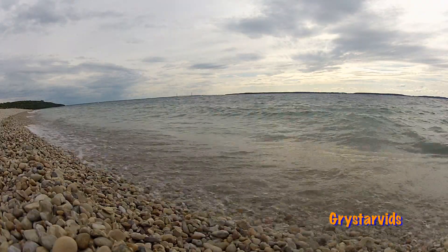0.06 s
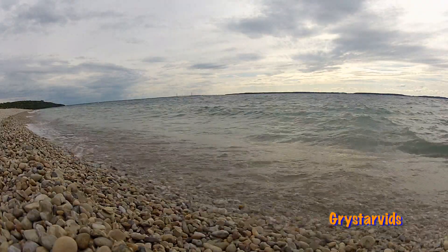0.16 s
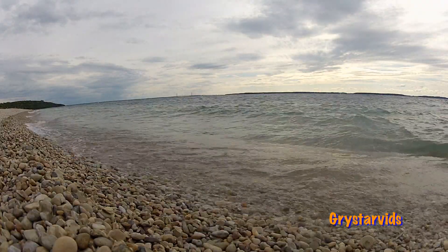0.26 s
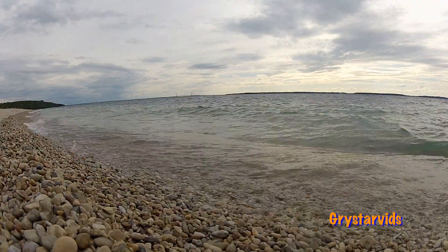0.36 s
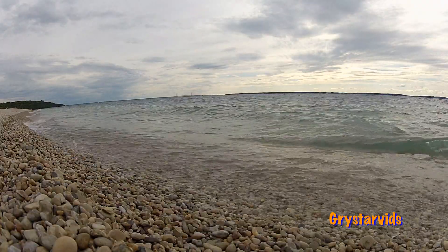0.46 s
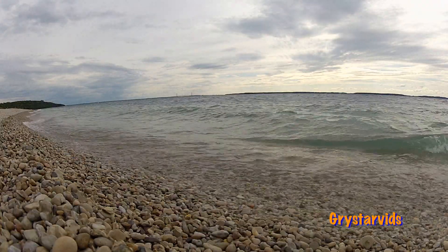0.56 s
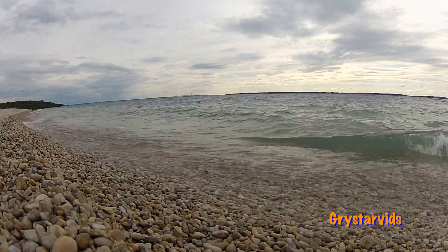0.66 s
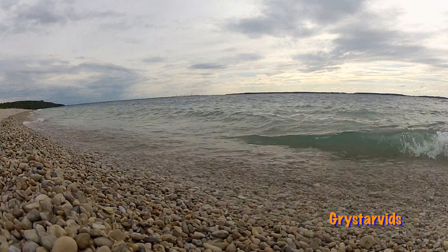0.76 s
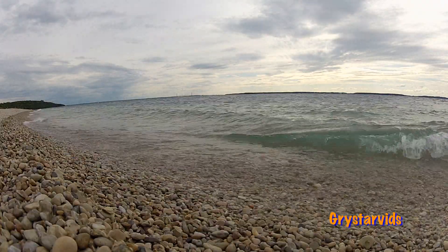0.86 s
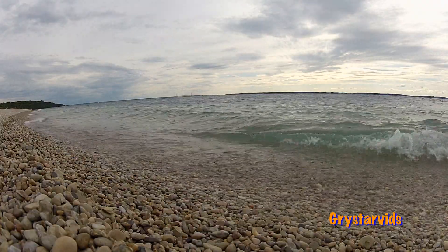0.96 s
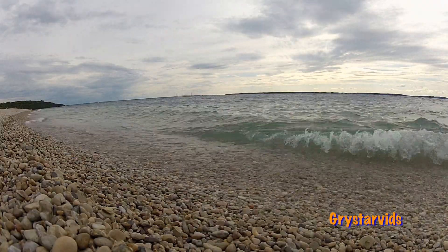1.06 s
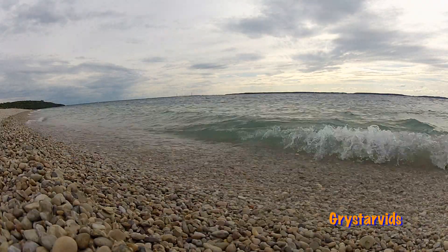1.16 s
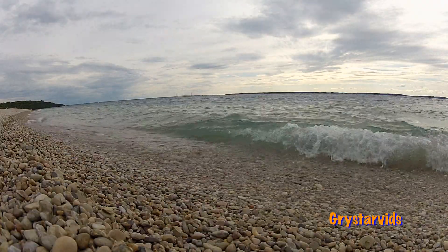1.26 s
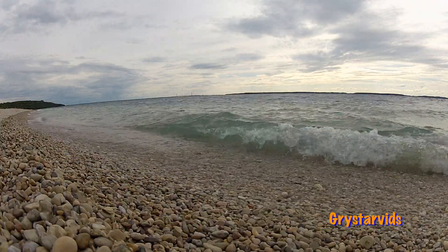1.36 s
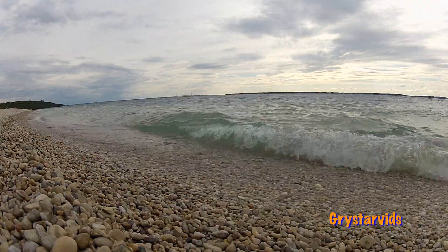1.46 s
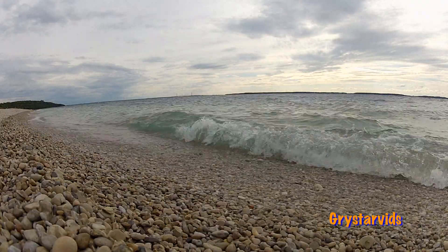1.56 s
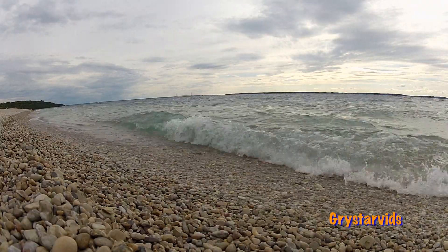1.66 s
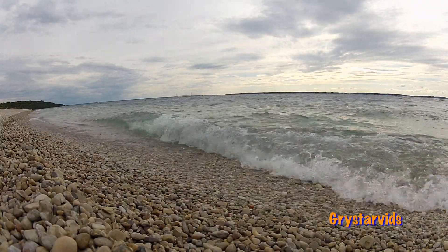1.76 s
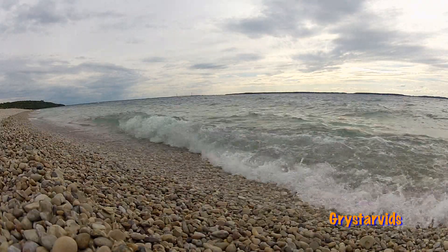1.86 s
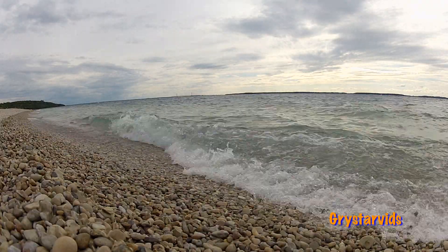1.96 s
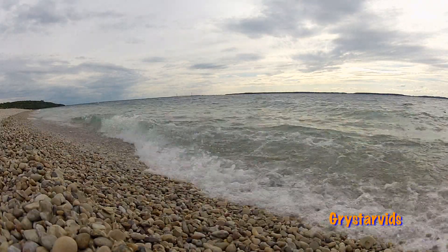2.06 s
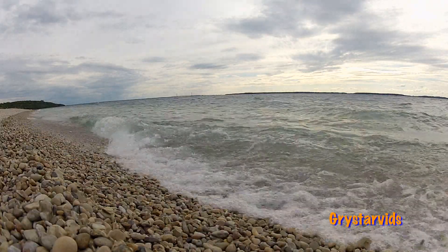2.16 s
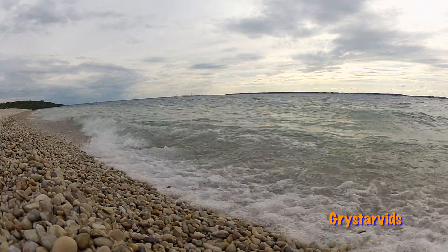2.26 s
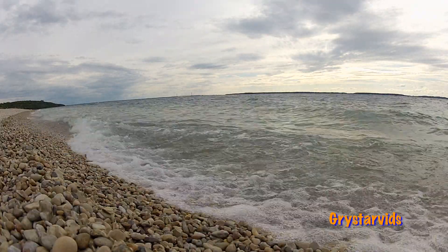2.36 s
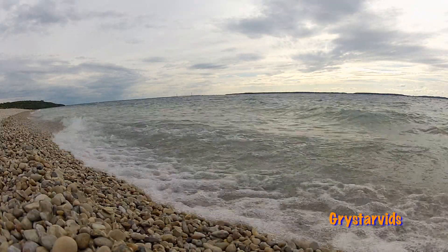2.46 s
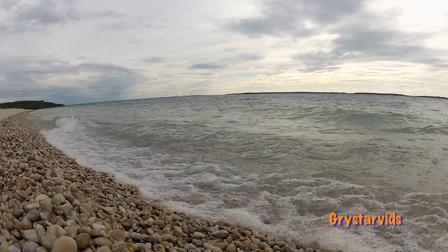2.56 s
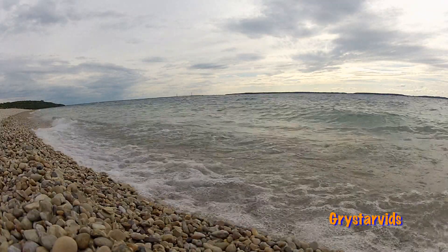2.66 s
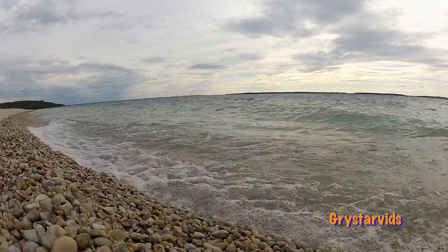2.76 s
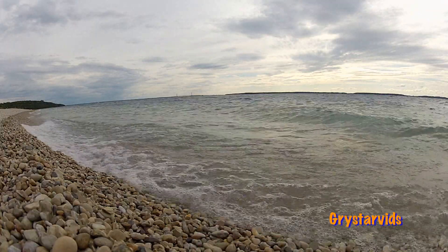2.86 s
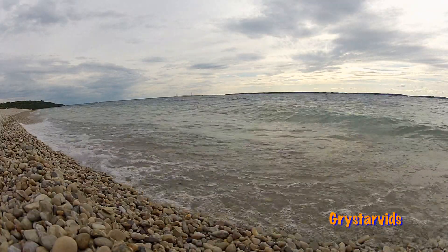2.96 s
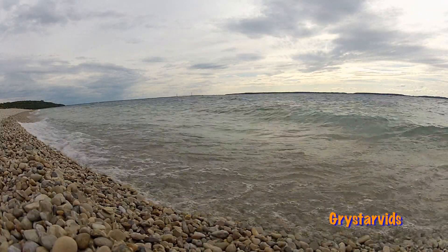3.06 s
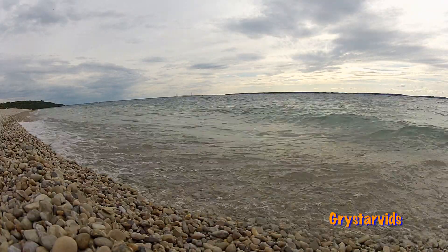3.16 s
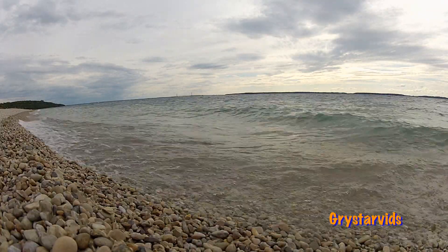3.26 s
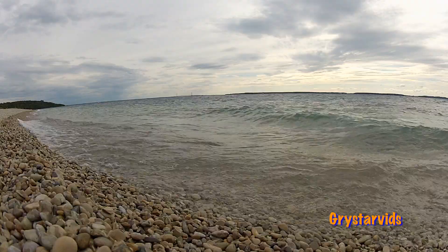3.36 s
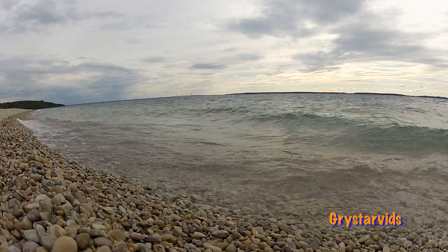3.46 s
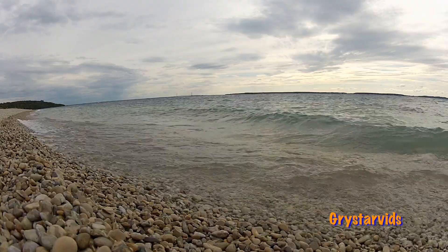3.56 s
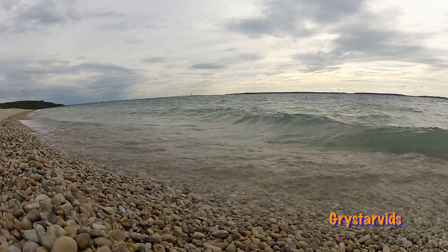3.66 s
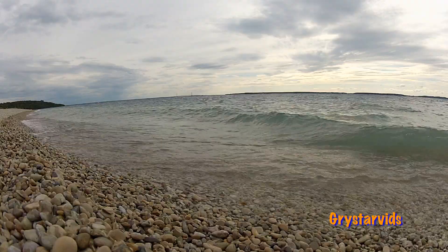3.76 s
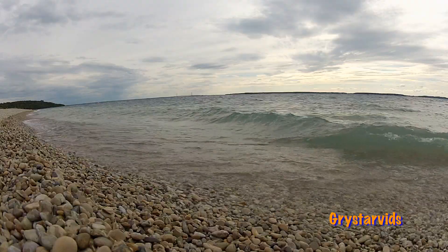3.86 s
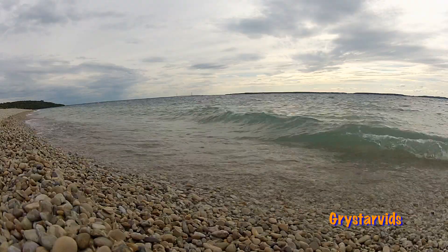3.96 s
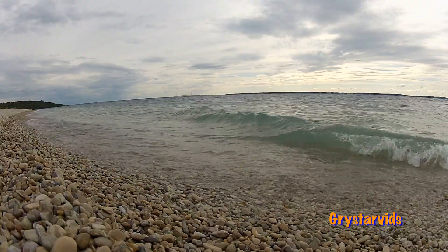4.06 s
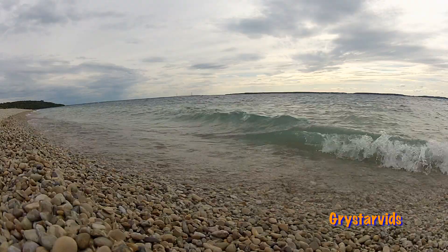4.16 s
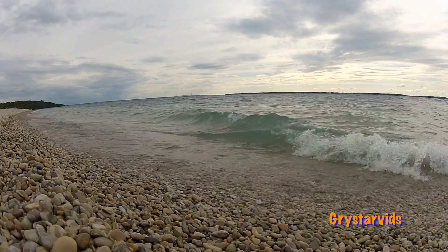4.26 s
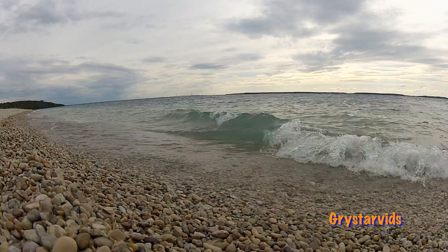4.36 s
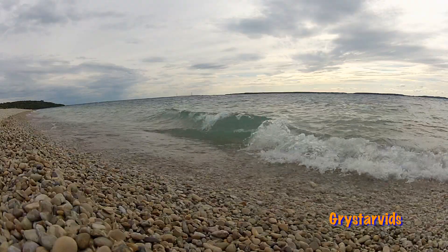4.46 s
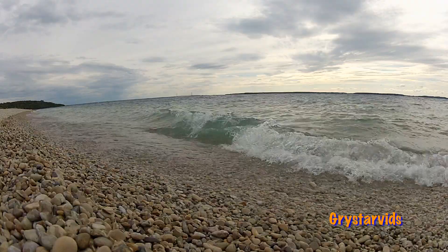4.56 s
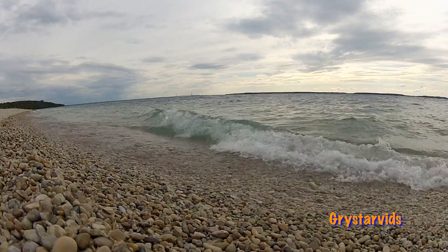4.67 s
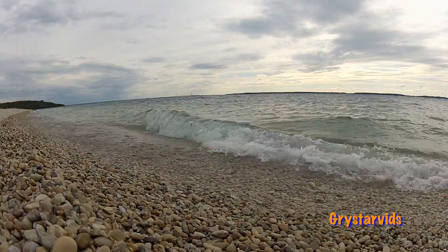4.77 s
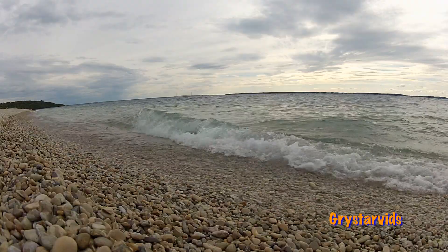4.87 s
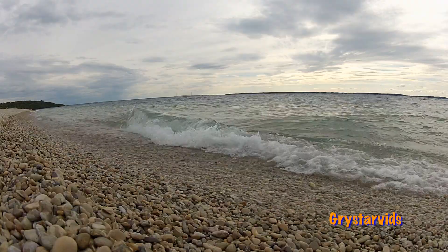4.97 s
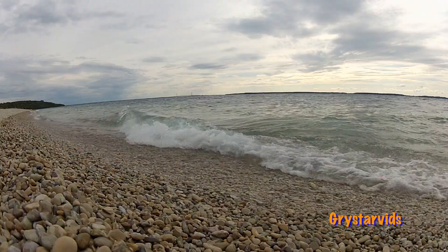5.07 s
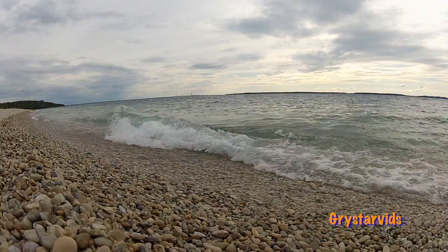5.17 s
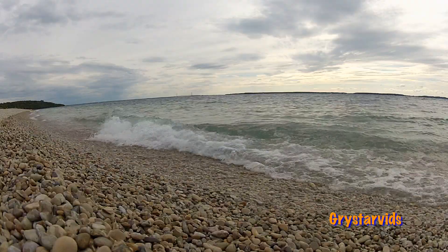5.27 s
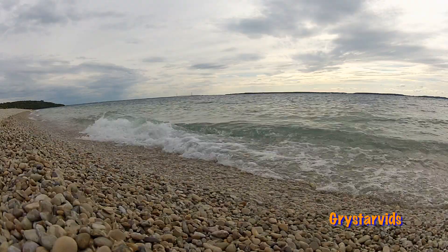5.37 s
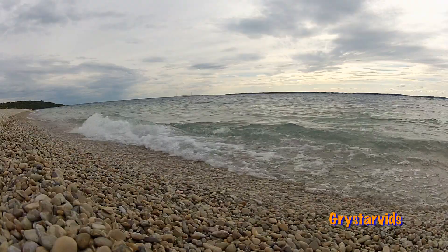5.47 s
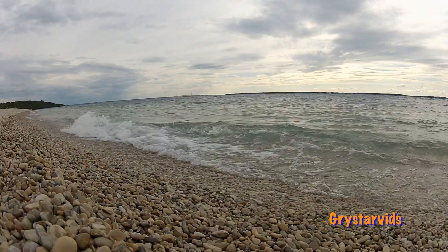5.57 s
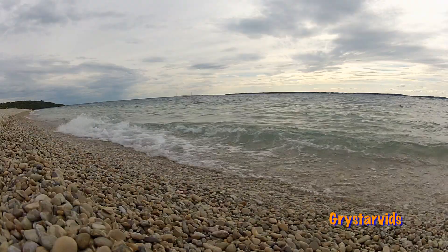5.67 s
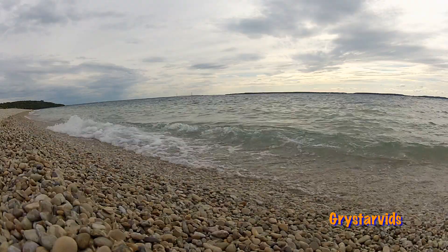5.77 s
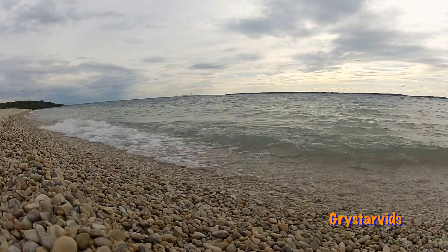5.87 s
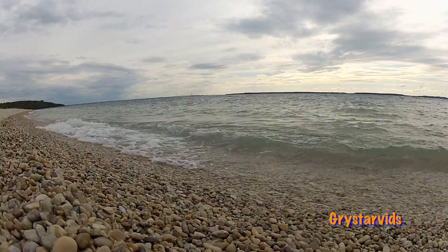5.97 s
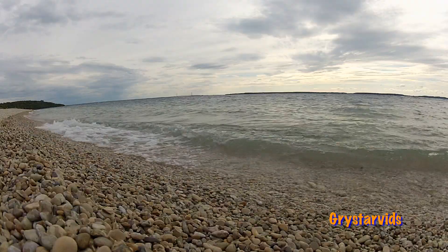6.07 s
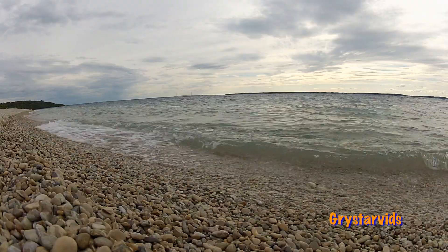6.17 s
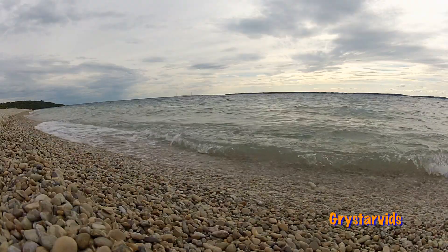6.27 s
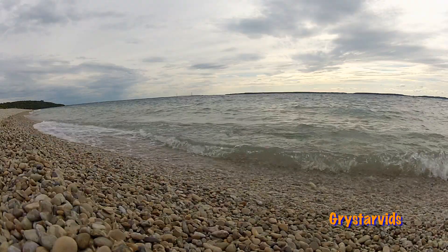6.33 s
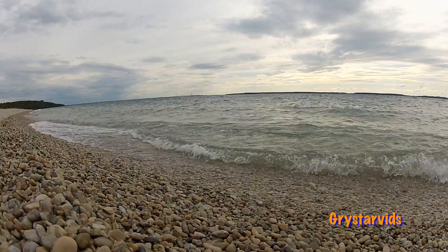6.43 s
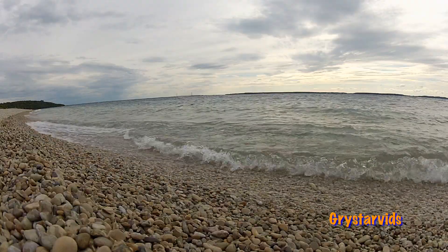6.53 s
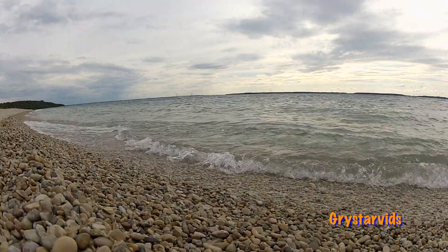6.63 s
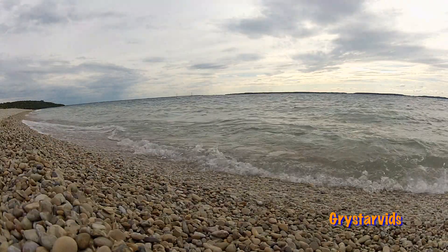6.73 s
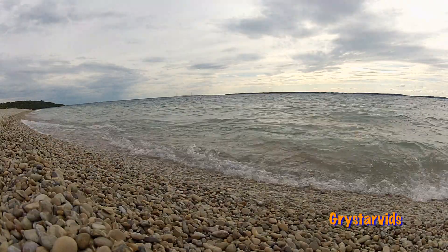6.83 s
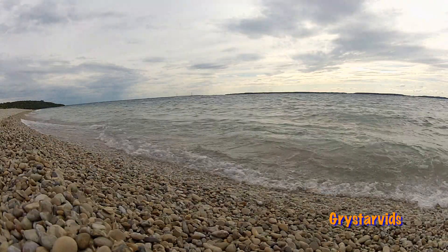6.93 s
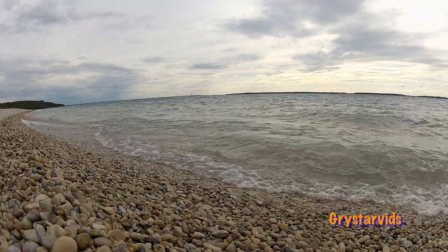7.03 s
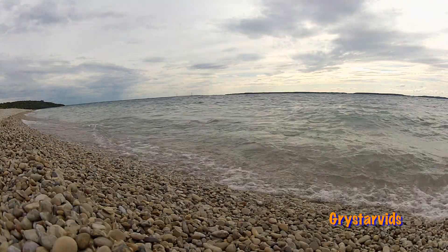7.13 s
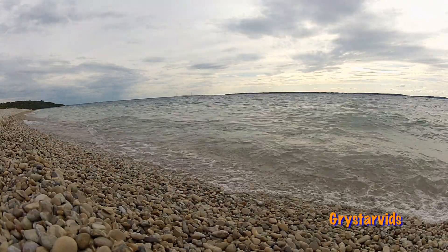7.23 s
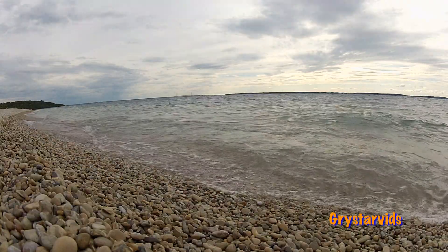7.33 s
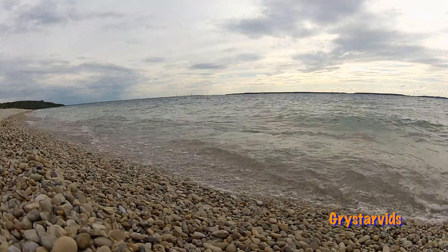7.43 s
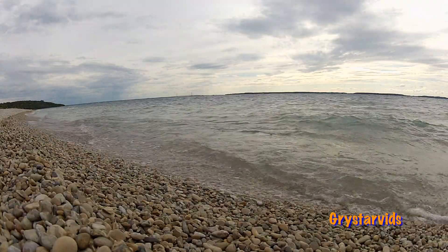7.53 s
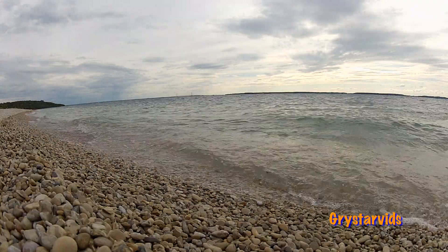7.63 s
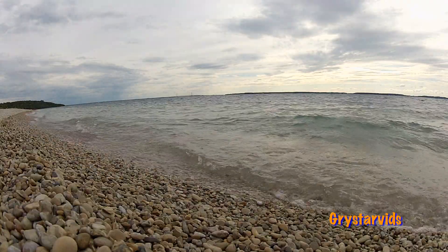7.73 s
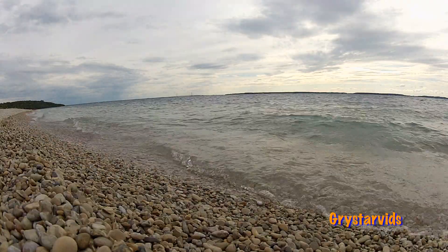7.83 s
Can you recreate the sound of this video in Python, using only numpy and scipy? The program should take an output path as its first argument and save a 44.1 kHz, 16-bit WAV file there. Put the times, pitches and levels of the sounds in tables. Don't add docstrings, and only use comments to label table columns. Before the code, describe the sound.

Small waves on a pebble beach, heard close through a tiny microphone sealed in a plastic case. Surf swells and crashes at about two seconds, again past four, and more weakly after six, each fading into a bubbling wash. A few stones knock, drops tick, and low wind booms throughout, with hollow thumps thickening near the end over faint hiss.

```python
import sys
import numpy as np
from scipy import signal
from scipy.fft import rfft, irfft, next_fast_len
from scipy.io import wavfile
from scipy.ndimage import uniform_filter1d, map_coordinates

SR = 44100
rng = np.random.default_rng(int(sys.argv[2]) if len(sys.argv) > 2 else 0)


def waveform_to_disk(signal):
    frames = np.transpose(np.atleast_2d(signal))
    scaled = np.clip(frames, -1, 1) * 32767
    samples = np.round(scaled).astype(np.int16)
    wavfile.write(sys.argv[1], SR, samples)


def how_loud(loudness_db):
    steps = np.asarray(loudness_db, float) / 20
    return 10 ** steps


N = 348390


def rms_one(x):
    return x / np.sqrt(np.mean(x ** 2) + 1e-20)


def noise_band(low_hz, high_hz):
    return band(rng.standard_normal(N), low_hz, high_hz)


def band(x, low_hz, high_hz):
    return signal.sosfilt(signal.butter(3, [low_hz, high_hz], "band", fs=SR, output="sos"), x)


def drift(rate_hz):
    step, settle = 20, 2000
    pole = np.exp(-2 * np.pi * rate_hz * step / SR)
    coarse = rng.standard_normal(N // step + settle + 2)
    slow = signal.lfilter([1], [1, -2 * pole, pole * pole], coarse)[settle:]
    return np.interp(np.arange(N) / step, np.arange(len(slow)), rms_one(slow))


def swells(rows, *laws):
    t = np.arange(0, N + 64, 64) / SR
    start, hold, *levels = np.transpose(rows)[:, :, None]
    early = np.maximum(start - t, 0)
    late = np.maximum(t - start - hold, 0)
    curves = []
    for level_db, (swell, fade, lull_db) in zip(levels, laws):
        strongest = (level_db - swell * early - fade * late).max(axis=0)
        curves.append(np.interp(np.arange(N) / SR, t, np.maximum(strongest, lull_db)))
    return curves


def ring(clicks, hz, t60):
    r, w = how_loud(-60 / (t60 * SR)), 2 * np.pi * hz / SR
    return signal.lfilter([0, np.sin(w)], [1, -2 * r * np.cos(w), r * r], clicks + 1e-18)


def resonate(x, modes):
    size = next_fast_len(N + SR // 2, True)
    f = np.linspace(1, SR / 2, size // 2 + 1)
    power = 0
    for hz, width, level_db in modes:
        detune = (f - hz * hz / f) / width
        power = power + how_loud(2 * level_db) / (1 + detune ** 2) ** 2
    cepstrum = irfft(np.log(power + 1e-12) / 2, size)
    cepstrum[1:size // 2] *= 2
    cepstrum[size // 2 + 1:] = 0
    return irfft(rfft(x, size) * np.exp(rfft(cepstrum)), size)[:N]


def steady(x, over_s, share):
    power = np.abs(uniform_filter1d(x * x, round(over_s * SR)))
    swelling = np.sqrt(power + 0.054 * np.mean(x * x))
    return rms_one(x / swelling ** share)


# f/Hz, width/Hz, level/dB
CASE_MODES = [(543, 640, -22), (1186, 370, -1), (1591, 210, 2), (1800, 510, 0.5), (2040, 310, 3.5),
              (2423, 130, -6), (2735, 230, -4.5), (3240, 340, -14.5), (3900, 460, -25.5),
              (4110, 370, -25.5), (4775, 310, -16.5), (5110, 830, -17)]


def in_case(x):
    return resonate(x, CASE_MODES)


def bubbles(low_hz, high_hz, per_s, spread_db, cycles, far_db, surge_db):
    sizes = how_loud(spread_db * np.minimum(rng.exponential(1, N), 3.2)) * rng.choice([-1, 1], N)
    born = sizes * (rng.random(N) < per_s / SR)
    pitches = np.geomspace(low_hz, high_hz, 8)
    dealt = rng.integers(0, len(pitches), N)
    near = rms_one(sum(ring(born * (dealt == k), hz, cycles / hz) for k, hz in enumerate(pitches)))
    far = how_loud(far_db) * rms_one(noise_band(low_hz, high_hz))
    return rms_one(how_loud(surge_db) * in_case(band(near + far, low_hz, high_hz)))


# arrival t/s, hold t/s, breaking crest level/dB, trapped air level/dB, wash over pebbles level/dB
SURGES = [(0, .05, -67, -63.5, -57.5), (.3, .15, -69, -60.5, -59.5), (.54, 0.16, -59.5, -53, -52.5),
          (.72, .1, -54.5, -50, -51), (.95, 0.76, -56.5, -52, -51.5), (1.45, 0.12, -54.5, -49.5, -48),
          (1.6, 0.33, -53, -49.5, -47.5), (1.93, 0.15, -52.5, -47, -47), (2.42, 0.17, -65.5, -56, -53.5),
          (2.95, 0.39, -76, -64, -62), (3.35, 0.38, -70.5, -62.5, -60), (3.8, .06, -65, -60, -59.5),
          (3.94, 0.16, -62.5, -53, -55.5), (4.1, 0.24, -55.5, -52.5, -52.5), (4.42, 0.09, -53, -59.5, -51),
          (4.75, 0.29, -60.5, -62.5, -52), (5.5, .25, -68.5, -75, -61), (6.05, .04, -65.5, -62, -60.5),
          (6.16, .05, -62, -56, -56), (6.29, 0.43, -58, -53.5, -53.5), (6.72, 0.017, -59.5, -55.5, -53.5),
          (6.9, 0.35, -64.5, -57, -60.5), (7.56, .1, -65.5, -58, -54.5), (7.74, 0.017, -63.5, -53, -59.5)]
# swell rate/(dB/s), fade rate/(dB/s), lull level/dB
CREST_LAW = (54, 22.5, -72)
AIR_LAW = (61, 28, -68)
WASH_LAW = (60, 18.6, -62.5)


def surf(spill):
    crest_db, air_db, wash_db = swells(SURGES, CREST_LAW, AIR_LAW, WASH_LAW)
    crest = bubbles(747, 1486, 1500, 3.5, 8.5, 0.1, 0.9 * spill + 1.0 * drift(38))
    air = bubbles(1340, 1974, 1200, 4.3, 16.4, 0.08, 0.9 * spill + 0.2 * drift(43))
    wash = bubbles(1790, 3270, 2500, 3.7, 7.3, 0.15, 0.8 * spill + 1.04 * drift(31))
    roar_db = -68.5 + 0.6 * (crest_db + 56.5)
    roar = how_loud(roar_db) * rms_one(noise_band(307, 896))
    return how_loud(crest_db) * crest + how_loud(air_db) * air + how_loud(wash_db) * wash + roar


# arrival t/s, hold t/s, foam level/dB, fine bubbles level/dB
SPLASHES = [(0, 0.018, -66, -64.5), (.1, 0.24, -67.5, -68), (.56, 0.046, -63.5, -69),
            (.74, 0.031, -62, -64), (.9, 0.81, -61, -63.5), (1.4, 0.13, -58, -58.5), (1.58, 0.13, -56, -57),
            (1.83, 0.18, -57.5, -57.5), (2.12, 0.088, -63, -64), (2.38, .03, -67.5, -68),
            (2.7, .02, -71, -70), (2.81, .02, -71, -67.5), (2.98, 0.022, -70.5, -74),
            (3.9, .05, -68.5, -69), (4.01, 0.12, -63.5, -64.5), (4.2, .13, -59, -60.5),
            (4.4, 0.067, -58, -62.5), (4.57, 0.11, -60.5, -65), (4.8, 0.038, -60, -74),
            (4.93, 0.19, -63.5, -74), (5.28, 0.053, -65, -73.5), (5.45, 0.2, -70.5, -82),
            (6.07, .12, -68.5, -69), (6.25, 0.16, -64, -67), (6.46, 0.11, -61.5, -63),
            (6.68, 0.078, -62, -67), (7.0, 0.018, -68.5, -71), (7.19, 0.026, -69.5, -74),
            (7.57, .08, -70.5, -65.5), (7.8, .05, -70.5, -69)]
# swell rate/(dB/s), fade rate/(dB/s), lull level/dB
FOAM_LAW = (55, 41, -74.5)
FINE_LAW = (70, 34, -78.5)


def spray(spill):
    foam_db, fine_db = swells(SPLASHES, FOAM_LAW, FINE_LAW)
    fine = bubbles(2890, 3670, 2000, 1.1, 2.7, 0.1, 0.6 * spill + 0.83 * drift(35))
    foam = bubbles(3294, 6940, 2500, 4.5, 2.9, 0.1, 0.6 * spill + 0.47 * drift(38))
    return how_loud(fine_db) * fine + how_loud(foam_db) * foam


# arrival t/s, hold t/s, boom level/dB, buffeting level/dB
GUSTS = [(0, 0.43, -53, -65), (.63, 0.085, -57, -61), (.91, 0.1, -55, -64.5), (1.14, 0.03, -62, -66),
         (1.31, 0.031, -65, -66.5), (1.51, 0.027, -67, -75), (1.64, 0.024, -65, -64), (1.78, 0.2, -65, -66),
         (1.98, 0.48, -51.5, -68), (2.38, 0.043, -46, -62.5), (2.51, 0.34, -52.5, -65),
         (2.85, 0.27, -57, -68), (3.22, 0.045, -56.5, -72), (3.3, 0.39, -64, -70.5),
         (3.92, 0.15, -62.5, -72), (4.16, 0.048, -57, -74), (4.39, 0.098, -49.5, -62),
         (4.76, 0.042, -66, -66), (4.89, 0.016, -54, -63), (5.04, 0.024, -52.5, -62.5),
         (5.3, 0.32, -54, -65), (5.72, 0.24, -54.5, -65.5), (6.0, 0.35, -55.5, -66.5),
         (6.4, 0.028, -49, -72), (6.58, 0.12, -59, -63.5), (6.71, 0.19, -48.5, -60.5),
         (7.0, 0.13, -51, -59), (7.18, 0.1, -57, -54), (7.37, 0.059, -56, -68), (7.54, 0.46, -50, -59)]
# swell rate/(dB/s), fade rate/(dB/s), lull level/dB
BOOM_LAW = (230, 240, -63.5)
BUFFET_LAW = (75, 200, -69.5)
# f/Hz, width/Hz, level/dB
AIR_SPRING = [(141.5, 110, -7), (166.9, 35, 8.5), (220, 107, -8.5)]


def gusts():
    boom_db, buffet_db = swells(GUSTS, BOOM_LAW, BUFFET_LAW)
    boom = steady(resonate(noise_band(85, 340), AIR_SPRING), 0.05, 0.55)
    dulled = signal.butter(2, 280, fs=SR, output="sos")
    buffet = steady(signal.sosfilt(dulled, noise_band(190, 890)), 0.03, 0.6)
    return how_loud(boom_db) * boom + how_loud(buffet_db) * buffet


# arrival t/s, hold t/s, thud level/dB, push level/dB
LEANS = [(.08, 0.13, -63.5, -68), (.35, 0.19, -65, -61), (.62, .05, -66, -69), (.86, 0.069, -64, -64),
         (1.14, .03, -69, -68), (1.64, 0.025, -59, -83), (1.9, .06, -67, -75), (2.9, 0.071, -70.5, -71),
         (3.25, .1, -68, -71.5), (3.55, 0.22, -72, -70), (3.92, .1, -77, -68), (4.25, .2, -63.5, -78),
         (4.52, .04, -71, -75), (4.86, .06, -69, -77), (5.1, .08, -67.5, -76), (5.4, 0.23, -71, -73),
         (5.75, .2, -62.5, -71), (6.14, .15, -71, -67), (6.39, 0.099, -64, -61), (6.67, .03, -68, -73),
         (6.76, 0.06, -62, -65), (7.02, 0.052, -61.5, -69), (7.22, .2, -66, -61), (7.53, 0.047, -66, -78),
         (7.8, .1, -67, -78)]
# swell rate/(dB/s), fade rate/(dB/s), lull level/dB
THUD_LAW = (130, 130, -75.5)
PUSH_LAW = (78, 130, -81)


def leans():
    thud_db, push_db = swells(LEANS, THUD_LAW, PUSH_LAW)
    thud = steady(noise_band(50, 143), 0.025, 0.55)
    push = steady(noise_band(21, 32), 0.13, 0.43)
    return how_loud(thud_db) * thud + how_loud(push_db) * push


# f/Hz, level/dB per Hz
HISS_COLOUR = [(40, -10), (200, 4.5), (800, -27), (2500, -25.5), (4500, -21), (5500, -34.5), (6000, -41)]


def hiss():
    hz, level_db = np.transpose(HISS_COLOUR)
    bins = np.linspace(1, SR / 2, N // 2 + 1)
    colour = how_loud(np.interp(np.log(bins), np.log(hz), level_db, right=-80))
    return how_loud(-65) * rms_one(irfft(rfft(rng.standard_normal(N)) * colour, N))


# t/s, peak level/dB, f/Hz
KNOCKS = [(.0638, -59, 2040), (.1685, -48, 2150), (0.6478, -38, 2060), (0.7046, -32, 1470),
          (0.721, -35, 1800), (.7535, -35, 1860), (0.767, -33, 1800), (0.8068, -42, 1800),
          (1.1274, -36, 1650), (1.2206, -33, 2040), (1.9862, -35, 1960), (2.193, -45, 1920),
          (3.694, -35.5, 1740), (3.881, -40.5, 1050), (6.127, -44, 2100), (7.3935, -62.5, 1590),
          (7.4664, -43, 1770), (7.522, -45, 2000)]


def pebbles():
    knocks = np.zeros(N)
    t = np.arange(round(0.01 * SR)) / SR
    shape = (1 - np.exp(-t / 0.0006)) * np.exp(-t / 0.0017)
    for start, peak_db, hz in KNOCKS:
        i = round(start * SR)
        knocks[i:i + len(t)] += how_loud(peak_db + 5) * shape * np.sin(2 * np.pi * hz * t)
    return in_case(knocks)


# t/s, peak level/dB
TICKS = [(2.375, -52), (2.799, -58), (2.8374, -56), (2.9457, -72), (2.9662, -68.5), (4.0944, -49),
         (4.159, -47), (5.8301, -55), (5.907, -61), (6.0741, -53), (6.4253, -58), (6.996, -50),
         (7.047, -58), (7.194, -57), (7.2082, -51), (7.6924, -56)]


def drops():
    clicks = np.zeros(N)
    for start, peak_db in TICKS:
        clicks[round(start * SR)] = how_loud(peak_db - 5)
    return ring(clicks, 4850, 0.025) + 0.75 * ring(clicks, 5100, 0.0064)


# t/s, port level/dB, air spring level/dB
SLAPS = [(4.18, -63, -52), (4.44, -68, -49), (4.472, -57, -40), (4.828, -49.5, -42.5), (5.421, -62, -46),
         (5.809, -59, -41), (5.894, -64, -49), (6.284, -60, -40), (6.709, -61, -39), (6.766, -68, -48.5),
         (6.987, -42, -42), (7.0, -46, -44), (7.02, -47, -43), (7.164, -44, -45), (7.177, -50, -42),
         (7.192, -44, -50), (7.205, -47, -33.5), (7.2231, -62, -35.5), (7.241, -46, -34), (7.262, -59, -39),
         (7.279, -68, -37), (7.293, -54, -43), (7.46, -47, -46), (7.538, -64, -42), (7.576, -46, -59),
         (7.609, -46, -47), (7.821, -46, -39), (7.854, -65, -39)]


def slaps():
    port, spring = np.zeros((2, N))
    for start, port_db, spring_db in SLAPS:
        i = round(start * SR)
        port[i], spring[i] = how_loud(port_db), how_loud(spring_db)
    kick = ring(port, 300, 0.06) + 0.6 * ring(port, 520, 0.04) + 0.3 * ring(port, 790, 0.022)
    boom = band(ring(spring, 185, 0.07), 86, 430)
    puff = signal.lfilter([1], [1, -np.exp(-1 / (0.006 * SR))], port + 1e-18)
    edge = how_loud(-24) * puff * rms_one(noise_band(2500, 5950))
    return kick + boom + edge


def scene():
    spill = drift(38)
    water = surf(spill) + spray(spill)
    wind = gusts() + leans() + slaps()
    return (water + wind + hiss() + pebbles() + drops())[None]


def roll_off(x):
    return signal.sosfilt(signal.butter(12, 15690, fs=SR, output="sos"), x)


def record(dry):
    slow_rate, holds = 12000, 4
    guard = signal.sosfilt(signal.butter(4, 5500, fs=SR, output="sos"), dry[0])
    slow = map_coordinates(guard, [np.arange(0, N, SR / slow_rate)], order=3, mode="nearest")
    held = np.repeat(slow, holds)
    out = signal.resample_poly(held, SR, holds * slow_rate)[:N]
    top_cut = signal.ellip(10, 0.1, 60, 15280, fs=SR, output="sos")
    out = signal.sosfiltfilt(top_cut, out)
    return roll_off(np.pad(out, (0, N - len(out)))[None])


dry = scene()
out = record(dry)
waveform_to_disk(out)
```